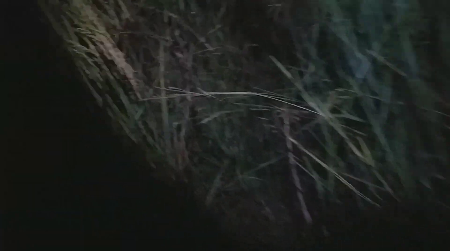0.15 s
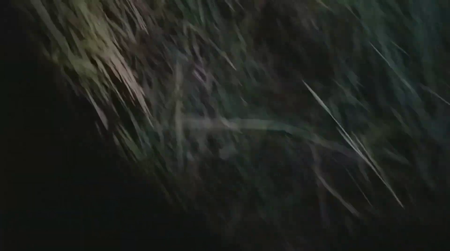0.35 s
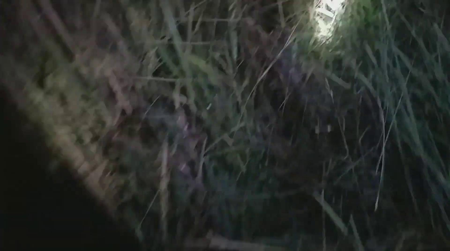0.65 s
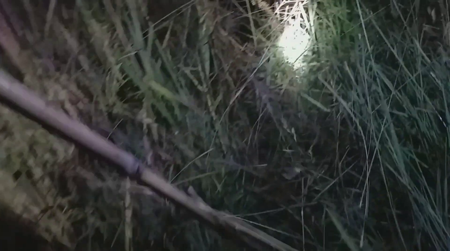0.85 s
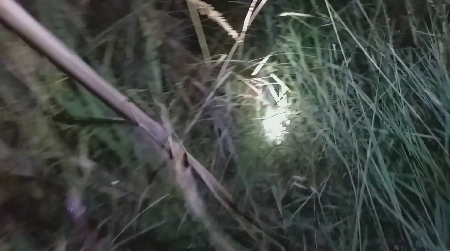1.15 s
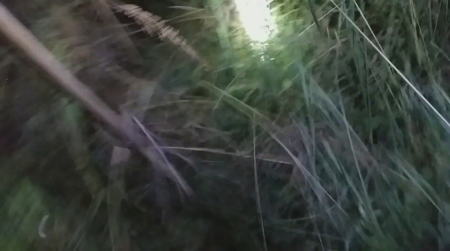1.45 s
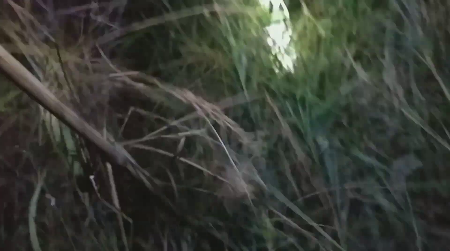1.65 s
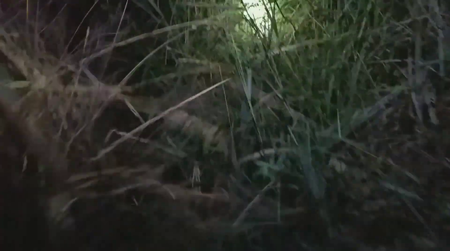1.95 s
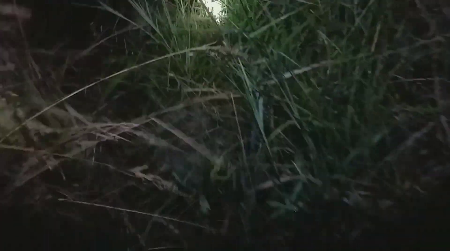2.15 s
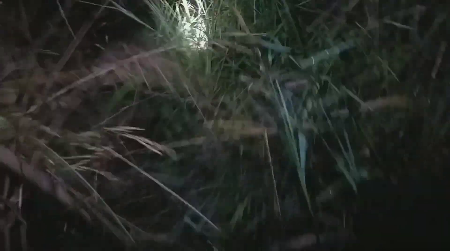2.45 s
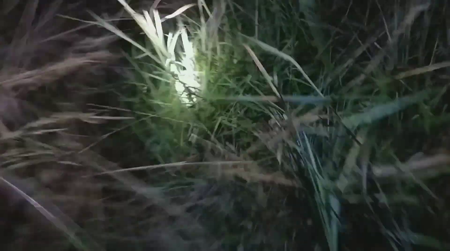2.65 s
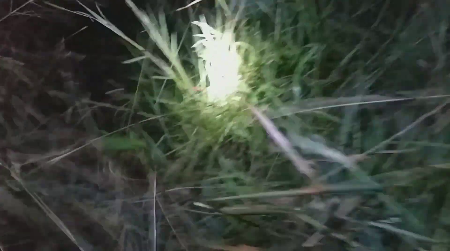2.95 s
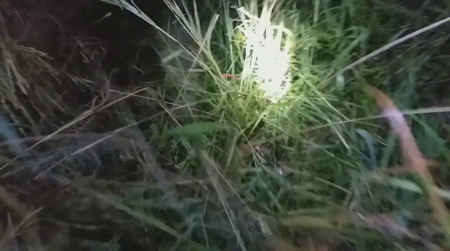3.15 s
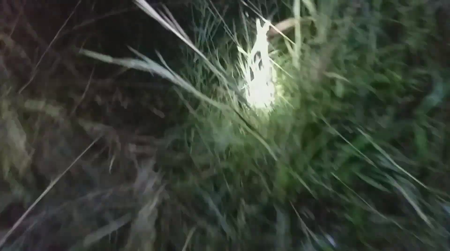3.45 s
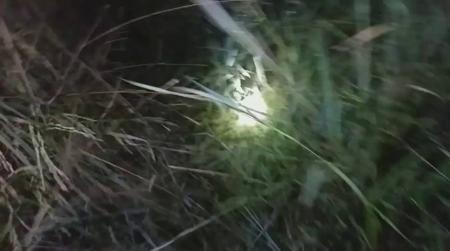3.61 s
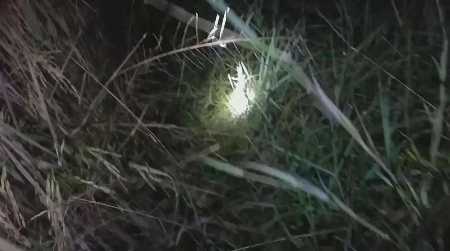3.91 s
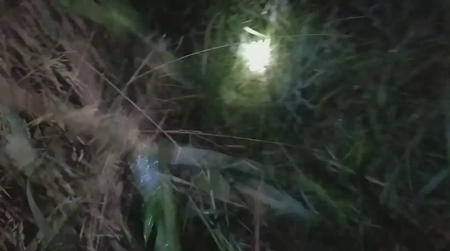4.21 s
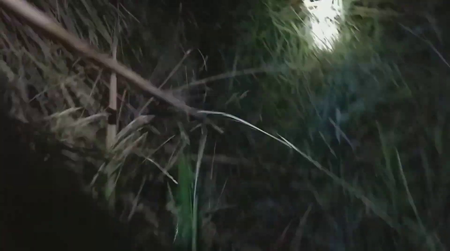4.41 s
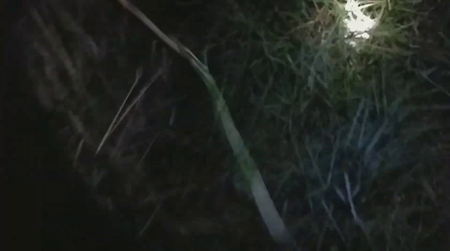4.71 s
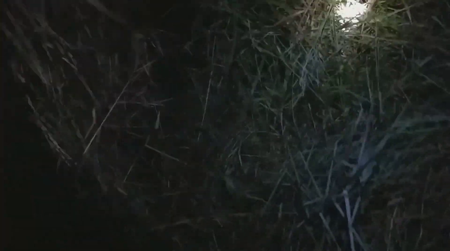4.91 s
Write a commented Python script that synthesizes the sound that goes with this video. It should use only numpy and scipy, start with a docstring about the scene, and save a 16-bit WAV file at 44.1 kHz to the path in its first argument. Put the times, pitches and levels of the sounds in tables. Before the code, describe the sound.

Handheld close microphone moving through dry grass at night. Brief tuft swishes and crisp ticks open, the dragging thickens after one second, with crunching matted straw and woody knocks. A sandy rush of husks passes before four seconds, then snaps and rustling continue to the end. Faint cricket trills, high chirps, constant airy hiss and very low rumble lie behind.

```python
"""Someone wades through tall dry grass at night while a cricket trills in runs and another chirps now and then.
From the start, noise-like slips swish as blades and stalks, tufts swell, straw crunches and bright bursts snap.
From one second, decaying sines knock as thick stems give way; the drag grows heavier, fullest near three seconds.
Just before four seconds, dry seed heads rush past as dense crackle, and the wading goes on to the end.
Throughout, shaped noise makes the hiss, insect shimmer and rumble of the night, and slow sines a faint hum."""
import sys
import numpy as np
from scipy import signal
from scipy.fft import rfft, irfft, next_fast_len
from scipy.io import wavfile
from scipy.ndimage import uniform_filter1d, map_coordinates

SR = 44100
rng = np.random.default_rng(int(sys.argv[2]) if len(sys.argv) > 2 else 0)


def store_wav(level_fs):
    """Save 16-bit WAV to argv[1]."""
    pcm = np.round(np.clip(np.atleast_2d(level_fs), -1, 1) * 32767)
    wavfile.write(sys.argv[1], SR, pcm.T.astype(np.int16))


N = 223631  # length in samples

# All levels are settings ahead of the random flutter and the master fade.
# Grass dragging along the legs all the while: start_s, blades_db, stalks_db
LEG_DRAG = [(0.05, -69, -67), (0.45, -62, -60), (0.66, -61, -66), (0.9, -54.5, -72), (1.22, -47, -52),
            (1.85, -49.5, -53), (2.65, -46.5, -52.5), (3.1, -45, -49), (3.5, -46.5, -51), (4.1, -47, -49.5),
            (4.7, -49, -54.5), (5.07, -54, -49.5)]
# Tufts swept aside: peak_s, length_s, blades_db, stalks_db
TUFT_SWEEPS = [(.226, .11, -46.3, -55), (.35, 0.086, -48, -50.5), (0.568, .09, -50.5, -62),
               (.768, .075, -51, -62), (1.168, 0.13, -53, -54), (1.351, .11, -46.5, -49),
               (1.531, .144, -47, -63), (2.026, .135, -45, -50), (2.442, .18, -45.5, -50.5),
               (2.752, .14, -42.5, -48.5), (2.982, .15, -47.5, -49), (3.307, .16, -43.5, -50),
               (3.765, .17, -43.5, -55.5), (3.945, .14, -45.5, -51), (4.239, .18, -47.3, -54.5),
               (4.39, .114, -45, -54.5), (4.978, .11, -48, -51.5)]
# Spectrum of the thin blades: frequency_hz, relative_level_db
BLADE_SPECTRUM = [(1200, -47), (3000, -13), (4500, -6.5), (6300, -10.5), (7200, -1.5), (7750, 2),
                  (8400, -3), (9200, -13), (10000, -21), (11000, -14), (12300, -7.5), (15700, -11.5)]
# Spectrum of the stiff stalks: frequency_hz, relative_level_db
STALK_SPECTRUM = [(500, -28), (1100, -14.5), (1650, -4.5), (2050, 0), (2650, -4), (3250, 1), (4500, -4),
                  (6000, -8), (8000, -6), (10000, -20.5), (15000, -10.5)]
# Weight coming down on matted straw: peak_s, length_s, crunch_db, pitch_hz
FOOTSTEPS = [(0.23, 0.045, -63, 1060), (.783, .026, -66, 640), (1.007, .03, -70, 630),
             (1.274, 0.22, -64, 850), (1.392, .04, -56.5, 1130), (1.714, 0.12, -51.5, 1000),
             (1.837, .13, -58, 850), (2.026, .11, -52.6, 1000), (2.286, .2, -62, 1340),
             (2.773, 0.11, -61.5, 1170), (2.99, .135, -56, 660), (3.232, 0.079, -58.5, 950),
             (3.366, .07, -54, 990), (3.592, .11, -54.5, 930), (4.047, 0.041, -53.5, 630),
             (4.133, .07, -55.5, 680), (4.28, 0.25, -57.5, 940), (4.853, 0.11, -56, 1090),
             (4.965, 0.11, -53, 760)]
# Spectrum of the crunching mat: frequency_hz, relative_level_db
MAT_SPECTRUM = [(150, -4.5), (400, -7), (580, 5.5), (800, 2), (1100, -1), (1600, 5), (2500, -2),
                (5000, -39)]
# Stalks that snap or flick, level ahead of their resonances: start_s, level_db, t60_s
STALK_SNAPS = [(.369, -37.5, 0.013), (0.377, -38.5, .0088), (.5453, -29.5, 0.0025), (0.5615, -34, 0.002),
               (0.57, -30.5, 0.0025), (.7258, -38.7, .021), (2.411, -36, .004), (2.505, -31, .004),
               (2.905, -38, .012), (4.016, -34, .018), (4.445, -33, .003), (4.531, -31, 0.0018),
               (4.586, -33.5, .02)]
# Thick stems that give way underfoot: start_s, level_db, pitch_hz
STEM_KNOCKS = [(1.0, -52, 650), (1.387, -46, 1090), (1.533, -35.5, 1440), (1.992, -43, 1015),
               (4.017, -45, 664), (4.048, -44, 620), (4.98, -46, 620)]
# Modes of a hollow stem: pitch_ratio, level_db
STEM_MODES = [(.74, -11), (1, 3), (1.27, -9)]
# A bunch of dry seed heads brushing past: time_s, level_db
SEED_HEAD_LEVELS = [(3.68, -54), (3.78, -50), (3.87, -46.5), (3.93, -41.5), (3.97, -50), (4.06, -54)]
# Spectrum of the rattling husks: frequency_hz, relative_level_db
HUSK_SPECTRUM = [(2000, -41), (3100, -9), (4500, 1), (5800, -1), (6800, -10), (8000, -1.5), (10000, -25.5)]
# Groups of the chirping cricket: start_s, level_db
CHIRP_GROUPS = [(-.062, -54.5), (.431, -51), (0.693, -51.3), (.967, -52), (1.495, -56), (1.784, -55),
                (2.034, -54.5), (3.064, -57), (4.582, -59)]
# Runs of the trilling cricket: start_s, end_s, level_db, pitch_hz, stroke_period_s
TRILL_RUNS = [(.001, .41, -59, 4280, .0359), (.431, .94, -57.5, 4220, .0382),
              (.953, 1.45, -57, 4280, .0385), (1.549, 1.81, -54, 4200, .0374),
              (1.864, 2.38, -58, 4250, .0399), (2.648, 2.84, -53, 4200, .0379),
              (3.033, 3.25, -52.5, 4270, .0369), (3.288, 3.72, -55, 4200, .0387),
              (4.209, 4.45, -58.5, 4250, .0334), (4.543, 5.065, -55.5, 4300, .0347)]
# Spectrum of the night hiss: frequency_hz, relative_level_db
HISS_SPECTRUM = [(200, -11.5), (500, -0.5), (1500, -2), (2050, -3), (2600, -12), (3200, -18), (6500, 11.5),
                 (7700, 7), (9500, -9), (12500, 6.5), (15700, -3.5)]
# Spectrum of the low rumble: frequency_hz, relative_level_db
RUMBLE_SPECTRUM = [(13, -48), (22, -23), (65, -2.5), (92, 2), (118, 0.5), (198, -12), (246, -15.5),
                   (330, -11.5), (430, -16), (730, -120)]
# Narrow bands of shimmer in the night air: centre_hz, width_hz, level_db
SHIMMER_BANDS = [(1996, 280, -67.5), (3260, 450, -62.5), (4236, 660, -61.5), (5590, 690, -60.3),
                 (7630, 1100, -58.5)]
# Sines of the distant hum, peak level: pitch_hz, level_db
HUM_TONES = [(55.5, -85), (80.6, -78.5), (101.5, -80), (120, -82)]
# Narrow bands in which the two channels differ: centre_hz, width_hz, side_share
WIDE_BANDS = [(1924, 186, 0.52), (9140, 580, -0.3)]

TUFT_RISE, STEP_RISE = 0.48, 0.48  # share of a sweep spent swelling, of a step spent pressing down
MAT_DRAG_DB, MAT_DRAG_HZ = -18, 1230  # moving stalks stir the mat too: level against the stalks, pitch
# Small chance snaps: rate, level over the blades ahead of the resonances, decay
TICKS_PER_S, TICK_DB, TICK_T60_S = 7, 9, 0.003
TOP_HZ = 15750  # upper band limit


def swish(blade_db, stalk_db):
    """Blades slide in dense clumps of slips; stalks rattle more coarsely. A harder push makes more slips."""
    push = unit(amp(blade_db))
    catch_db = 0.65 * wobble(22)  # the grass catches and slips free
    clumps_db = 0.48 * wobble(45) + 0.68 * wobble(260)
    blade_slips = crackle(3500 * push, spread_db=0.5, rub=1.0)
    blades = coloured(blade_slips, BLADE_SPECTRUM) * amp(blade_db + clumps_db)
    stalk_slips = crackle(1600 * push, spread_db=2, rub=0.71)
    stalks = coloured(stalk_slips, STALK_SPECTRUM) * amp(stalk_db + 0.41 * wobble(120))
    return patchy((blades + stalks) * amp(catch_db), depth_db=1.33)


def effort():
    """Levels in dB of blades and stalks: each tuft swells and fades over the steady drag."""
    blade_power, stalk_power = amp(curves(LEG_DRAG)) ** 2
    for peak_s, length_s, blade_db, stalk_db in TUFT_SWEEPS:
        push = swell(peak_s, length_s, TUFT_RISE)
        blade_power = blade_power + push * amp(blade_db) ** 2
        stalk_power = stalk_power + push * amp(stalk_db) ** 2
    return 10 * np.log10(blade_power), 10 * np.log10(stalk_power)


def patchy(x, depth_db, size=512):
    """Every passing leaf favours its own pitches for a few hundredths of a second."""
    spectrum = signal.stft(x, nperseg=size)[2]
    field = rng.standard_normal(spectrum.shape)
    field = uniform_filter1d(field, size=4, axis=0)  # blur across pitch
    field = uniform_filter1d(field, size=8, axis=1)  # blur across time
    return signal.istft(spectrum * amp(depth_db * unit(field)), nperseg=size)[1][:N]


def tread(stalk_db):
    """Packed straw crunches dully; the ring of the mat moves as the foot settles."""
    crunch_db, pitch_hz = weight(stalk_db)
    grit = coloured(crackle(900, spread_db=1.5, rub=0.93), MAT_SPECTRUM)
    ring = np.zeros(N)
    for centre_hz in (615, 770, 1082, 1413):
        nearness = np.exp(-(np.log(pitch_hz / centre_hz) / 0.31) ** 2)
        mode = filtered(grit, lambda hz: resonance(hz, centre_hz, 162))
        ring += nearness * unit(mode)
    return unit(0.55 * grit + unit(ring)) * amp(crunch_db + 1.72 * wobble(60))


def weight(stalk_db):
    """Level in dB and pitch in Hz of the crunch: steps press and let go; the strongest weighs most on pitch."""
    power = amp(stalk_db + MAT_DRAG_DB) ** 2
    weighted_pitch = power * MAT_DRAG_HZ
    for peak_s, length_s, crunch_db, pitch_hz in FOOTSTEPS:
        step = swell(peak_s, length_s, STEP_RISE) * amp(crunch_db) ** 2
        power = power + step
        weighted_pitch = weighted_pitch + step * pitch_hz
    return 10 * np.log10(power), weighted_pitch / power


def snaps(blade_db, echo_s=0.00235, echo=0.68):
    """Each snap is a bright burst of tearing fibres, answered at once by a close surface."""
    track, t = np.zeros(N), np.arange(SR // 20) / SR
    tick_samples = np.flatnonzero(rng.random(N) < TICKS_PER_S / SR)
    ticks = [(i / SR, blade_db[i] + TICK_DB, TICK_T60_S) for i in tick_samples]
    for start_s, level_db, t60_s in list(STALK_SNAPS) + ticks:
        burst = rng.choice([-1, 1], len(t)) * amp(level_db - 60 * t / t60_s)
        add(track, start_s, burst)
        add(track, start_s + echo_s, echo * burst)

    def stalk_modes(hz):
        """Three damped resonances brighten the bursts."""
        low = 1.74 * resonance(hz, 4630, 1960)
        middle = 1.95 * resonance(hz, 7100, 910)
        high = 0.61 * resonance(hz, 12500, 3000)
        return low + middle + high

    return filtered(track, stalk_modes)


def knocks(t60_s=0.026, attack_s=0.0018):
    """A thick stem buckles with a short hollow knock, a few damped sines at fixed ratios."""
    track, t = np.zeros(N), np.arange(SR // 10) / SR
    for start_s, level_db, pitch_hz in STEM_KNOCKS:
        ring = np.zeros(len(t))
        for ratio, mode_db in STEM_MODES:
            ring += amp(mode_db) * np.sin(2 * np.pi * (pitch_hz * ratio * t + rng.random()))
        envelope = amp(-60 * t / t60_s) * (1 - np.exp(-t / attack_s))
        add(track, start_s, amp(level_db) * ring * envelope)
    return track


def seed_heads():
    """Loose husks rattle together in a short, sandy rush over a faint steady rustle."""
    level_db, = curves(SEED_HEAD_LEVELS)
    husks = coloured(crackle(4000, spread_db=3.5, rub=0.54), HUSK_SPECTRUM)
    return husks * amp(level_db + 1.1 * wobble(150))


def triller():
    """Long runs of slightly arched notes that swell and fade with the grass in between."""
    track = np.zeros(N)
    for start_s, end_s, level_db, pitch_hz, period_s in TRILL_RUNS:
        for s in np.arange(start_s, end_s - period_s / 2, period_s):
            note = stroke(pitch_hz, glide=0.014, arch=0.022, length_s=0.028)
            add(track, s, amp(level_db + rng.normal(0, 0.93)) * note)
    return track * (1 + 0.42 * wobble(400))


def chirper(last_db=-2, count=4, period_s=0.0315):
    """Short groups of falling notes; the last stroke of each group is set weaker."""
    track = np.zeros(N)
    for start_s, level_db in CHIRP_GROUPS:
        times = start_s + period_s * np.arange(count)
        for s in times[times >= 0]:
            tired_db = last_db * (s == times[-1])
            note = stroke(pitch_hz=5726, glide=-0.083, arch=0.0071, length_s=0.0223)
            add(track, s, amp(level_db + tired_db + rng.normal(0, 0.5)) * note)
    return track * (1 + 0.34 * wobble(400))  # scattering in the grass roughens the notes


def stroke(pitch_hz, glide, arch, length_s):
    """One wing stroke of rms 1: its pitch follows the speed of the scraper along the file."""
    u = np.linspace(0, 1, int(length_s * SR))
    bend = glide * (u - 0.5) + arch * (np.sin(np.pi * u) - np.pi / 4)
    hz = pitch_hz * (1 + bend + rng.normal(0, 0.003))
    envelope = np.sin(np.pi * u ** 0.52)  # peaks early
    return unit(envelope * np.sin(2 * np.pi * np.cumsum(hz) / SR))


def night():
    """A steady hiss shimmers in narrow bands, the upper ones from far insects, over low rumble and faint hum."""
    hiss = amp(-58.5) * coloured(rng.standard_normal(N), HISS_SPECTRUM)
    rumble = amp(-70.0) * coloured(rng.standard_normal(N), RUMBLE_SPECTRUM)
    air = hiss + rumble
    for centre_hz, width_hz, level_db in SHIMMER_BANDS:
        band = filtered(rng.standard_normal(N), lambda hz: resonance(hz, centre_hz, width_hz) ** 2)
        air += unit(band) * amp(level_db + 1.84 * wobble(50))
    for pitch_hz, level_db in HUM_TONES:
        gain = amp(level_db + 3.1 * wobble(1))
        air += gain * np.sin(2 * np.pi * pitch_hz * np.arange(N) / SR + 0.5 * wobble(2.07))
    return air


def crackle(rate, spread_db, rub):
    """Tiny slips of uneven size, rate a second, over a share of smooth rubbing."""
    hits = rng.random(N) < rate / SR
    signs = rng.choice([-1, 1], N)
    sizes = amp(spread_db * np.clip(rng.standard_normal(N), -2, 2))
    return unit(unit(hits * signs * sizes) + rub * rng.standard_normal(N))


def swell(peak_s, length_s, rise):
    """Power of one smooth push: it grows for the share rise of its length, then fades."""
    t = np.arange(N) / SR - peak_s
    return np.exp(-(t / (length_s * np.where(t < 0, rise, 1 - rise))) ** 2)


def wobble(rate):
    """A smooth random curve, rate knots a second."""
    knots = rng.standard_normal(int(N * rate / SR) + 4)
    return map_coordinates(knots, [np.arange(N) * rate / SR])


def curves(rows):
    """One value per sample for each column after the time."""
    s, *columns = np.transpose(rows)
    return [np.interp(np.arange(N) / SR, s, column) for column in columns]


def coloured(x, points):
    """x with a spectrum of frequency_hz, level_db points, at rms 1."""
    f, db = np.transpose(points)
    return unit(filtered(x, lambda hz: amp(np.interp(np.log(hz + 1), np.log(f), db, left=-80))))


def filtered(x, response):
    """x times a response of frequency, padded so that tails do not wrap round."""
    m = next_fast_len(N + 8192)
    return irfft(rfft(x, m) * response(np.fft.rfftfreq(m, 1 / SR)), m)[..., :N]


def resonance(hz, centre, width):
    """Causal response of one damped mode."""
    return 1j * hz * width / (centre ** 2 - hz ** 2 + 1j * hz * width)


def add(track, s, sound):
    """Mix a short sound into the track at s seconds."""
    part = track[max(0, round(s * SR)):][:len(sound)]
    part += sound[:len(part)]


def amp(db):
    """Decibels to gain."""
    return 10 ** (np.asarray(db) / 20)


def unit(x):
    """Scaled to rms 1."""
    return x / np.sqrt(np.mean(x ** 2) + 1e-20)


def scene():
    """The field is heard nearly in mono, a little wider in two narrow bands."""
    blade_db, stalk_db = effort()
    grass = swish(blade_db, stalk_db) + seed_heads()
    underfoot = tread(stalk_db) + snaps(blade_db) + knocks()
    mid = grass + underfoot + chirper() + triller() + night()

    def side_bands(hz):
        """Share of the mid sound sent to the sides."""
        return sum(share * resonance(hz, centre, width) ** 2 for centre, width, share in WIDE_BANDS)

    side = filtered(mid + 0.35 * np.roll(mid, SR // 50), side_bands)  # with a copy 20 ms later
    return np.array([mid + side, mid - side])


def record(dry):
    """The level comes up over the first moment; nothing is kept above the band limit."""
    opening_db, = curves([(0.1, -4.5), (0.2, 0.27)])  # time_s, gain_db
    return filtered(dry * amp(opening_db), lambda hz: hz < TOP_HZ)


dry = scene()
out = record(dry)
store_wav(out)
```